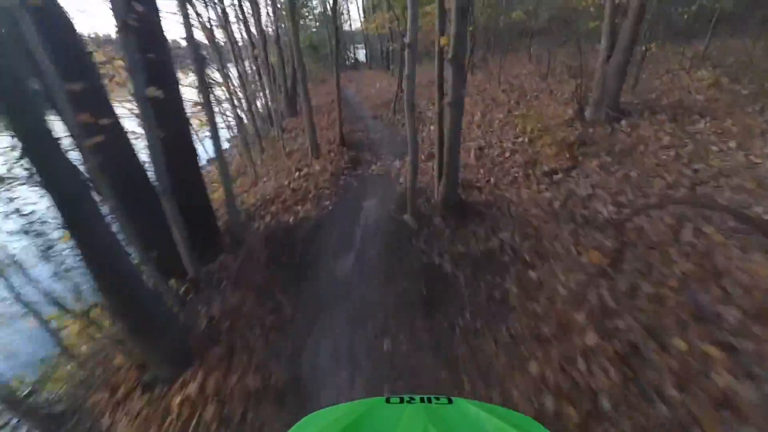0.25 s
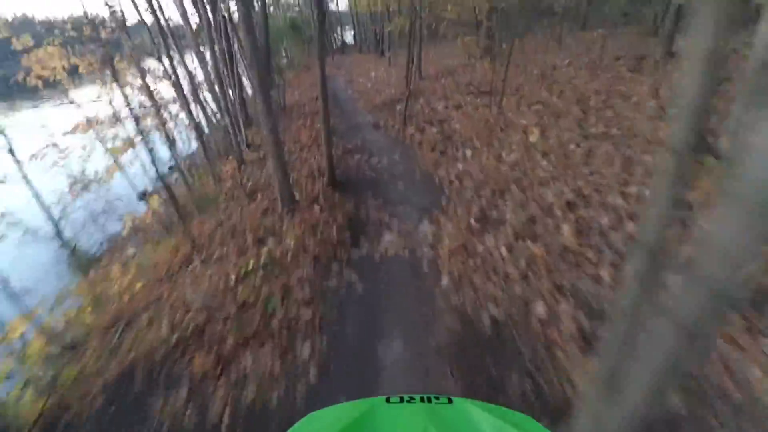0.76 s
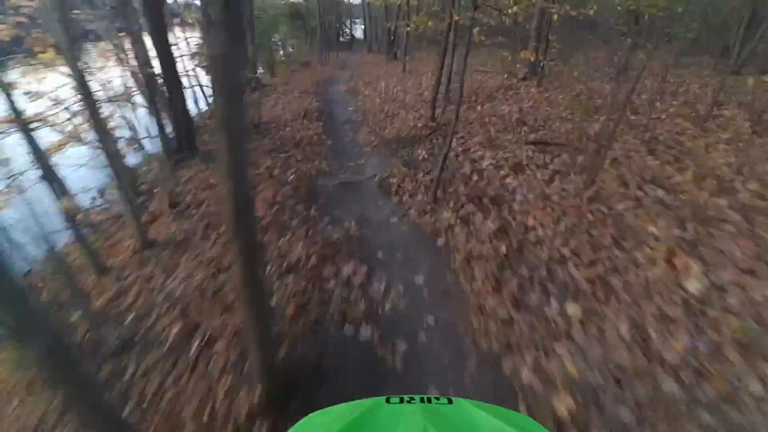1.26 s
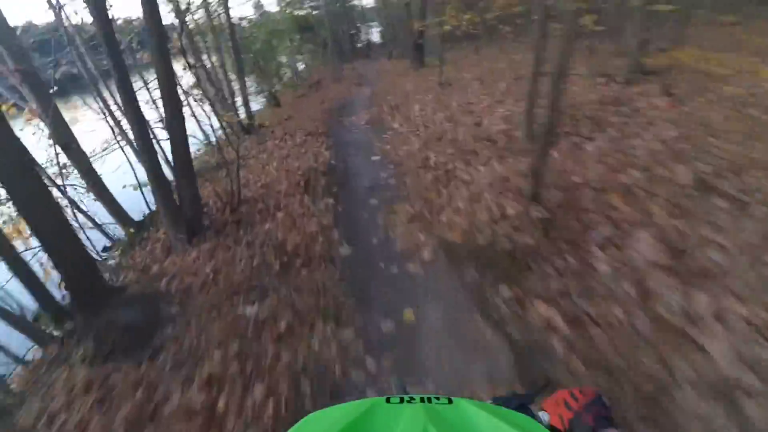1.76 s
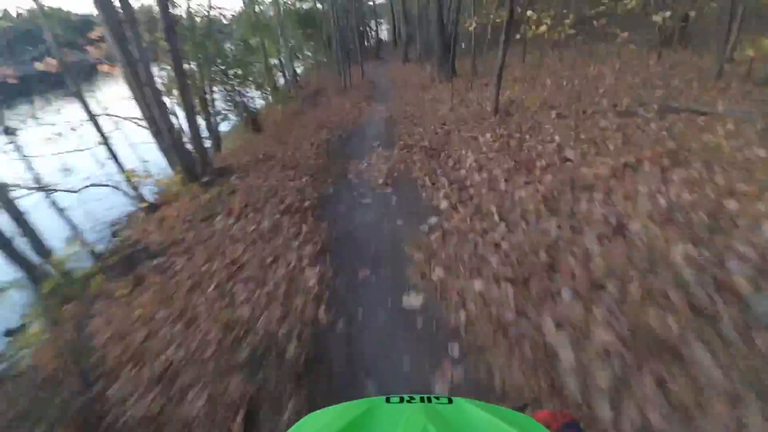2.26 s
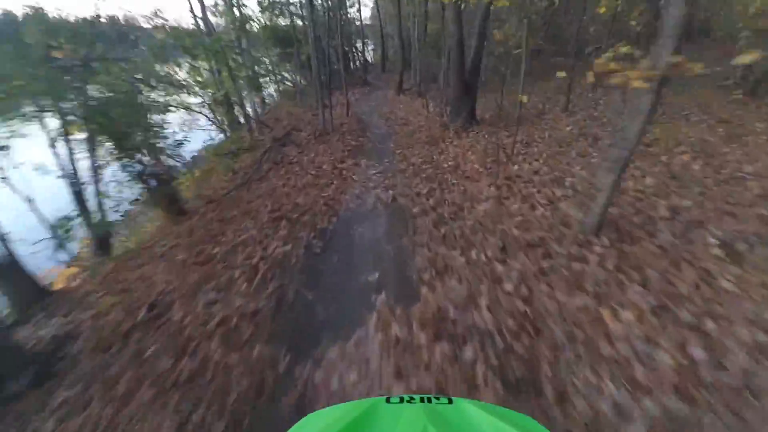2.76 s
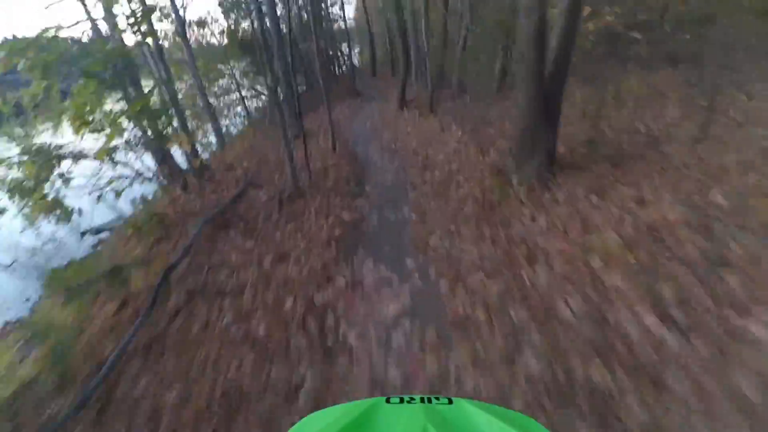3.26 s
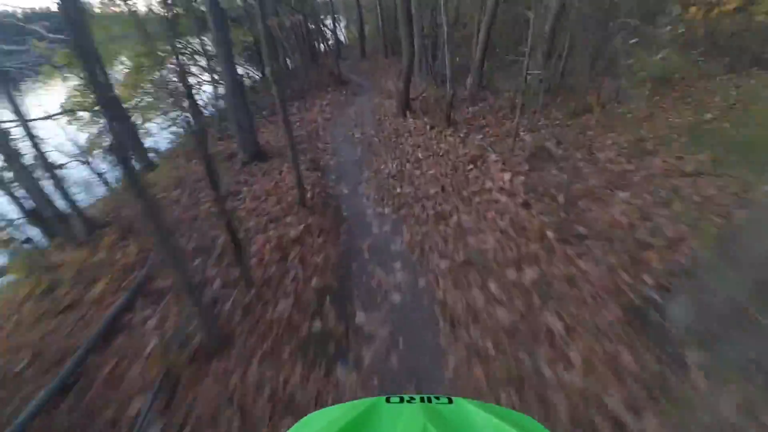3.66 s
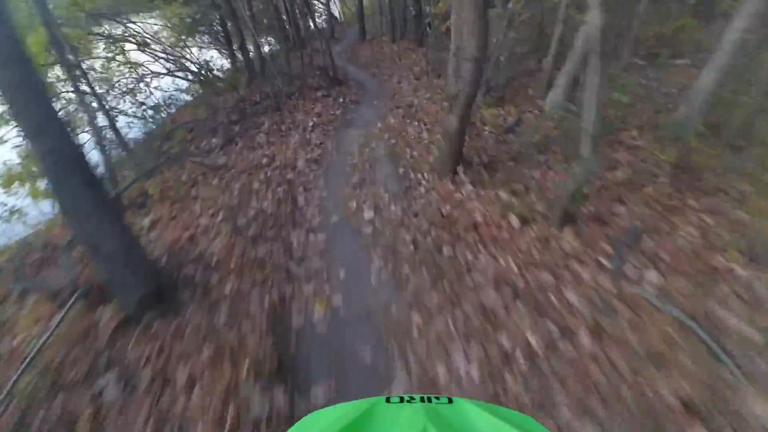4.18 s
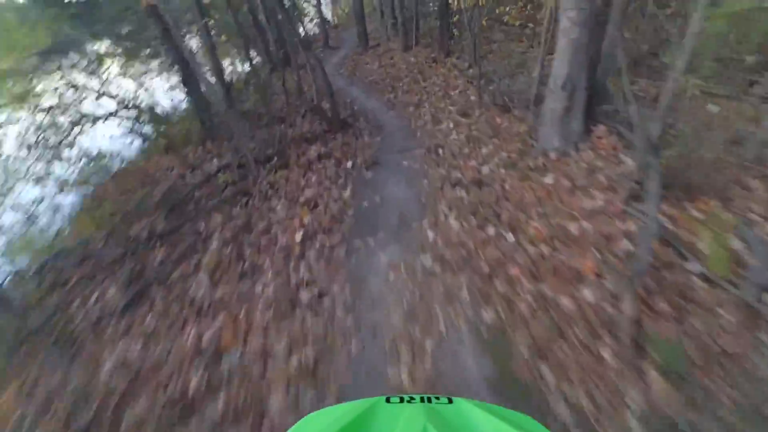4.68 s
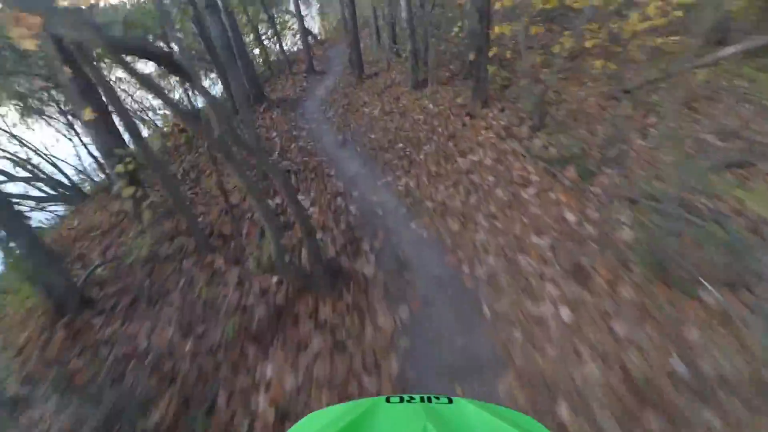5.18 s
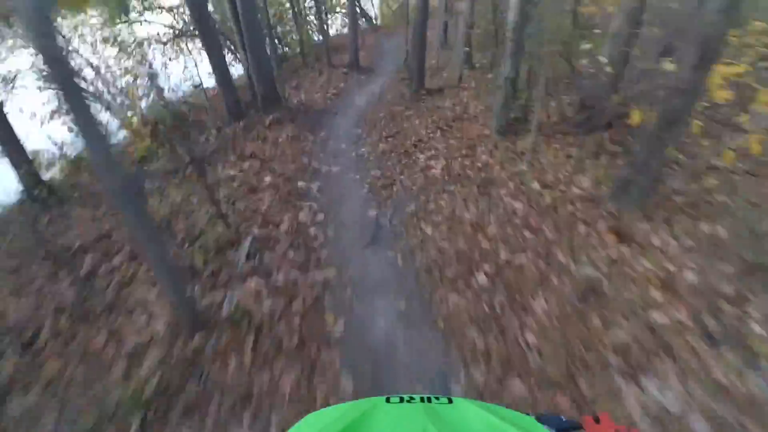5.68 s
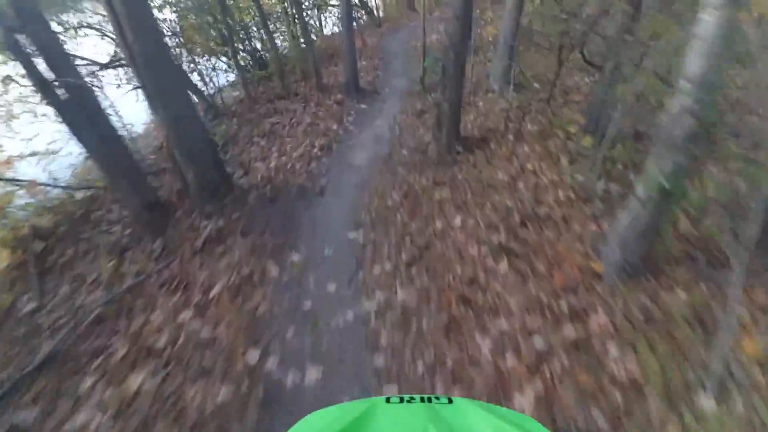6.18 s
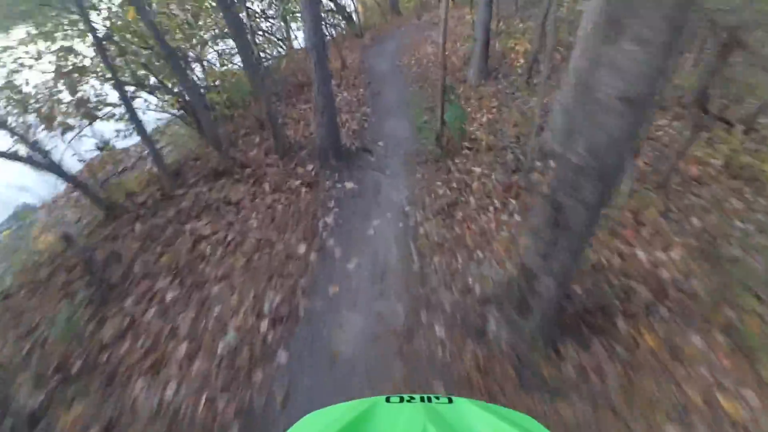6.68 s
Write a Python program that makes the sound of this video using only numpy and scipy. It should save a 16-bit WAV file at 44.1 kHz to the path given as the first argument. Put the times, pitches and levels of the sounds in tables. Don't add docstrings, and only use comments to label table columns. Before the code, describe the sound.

Outdoors on a woodland dirt path, a bicycle tyre hums faintly through a plastic camera case on the helmet. It starts fairly smooth with a low wobble, then a knock and clatter around one and a half seconds. Heavy bumps peak past three seconds, overloading the microphone; a calmer stretch follows, then creaking, thudding and clicking return late. Little dry leaf crackles and soft wind stay in the background.

```python
import sys
import numpy as np
from scipy import signal
from scipy.fft import rfft, irfft
from scipy.io import wavfile
from scipy.ndimage import uniform_filter1d

SR = 44100
rng = np.random.default_rng(int(sys.argv[2]) if len(sys.argv) > 2 else 0)


def attenuation_scalar(level_db):
    decades = np.asarray(level_db, float) / 20
    return 10 ** decades


def dump(signal):
    limited = np.clip(np.atleast_2d(signal).T, -1, 1)
    pcm = np.round(limited * 32767).astype(np.int16)
    wavfile.write(sys.argv[1], SR, pcm)


N = 305613
T = np.arange(N) / SR

# time_s, bob_db, shudder_db
TRAIL = [(0.0, -23.5, -52), (0.55, -27.5, -55.5), (0.75, -12, -50), (0.92, -21.5, -52), (1.6, -26.5, -47),
         (1.9, -17.5, -51.5), (2.2, -9.5, -41.5), (2.57, -27, -56.5), (3.13, -11, -42.5),
         (3.35, -22, -52.5), (4.0, -12.5, -36.5), (4.3, -23, -48.5), (4.69, -26, -52), (5.46, -18.5, -51.5),
         (5.66, -4.5, -39), (5.82, -20, -45.5), (6.2, -22.5, -55.5), (6.93, -21, -51)]
# extreme_s, signed_push, rebound_hz, mount_ring_db
JOLTS = [(0.245, -0.18, 9.7, -47), (0.583, -0.18, 2.7, -48.5), (.757, 0.14, 11.3, -45.5),
         (1.066, -0.19, 9.9, -45), (1.502, -0.24, 8.8, -62), (1.607, -0.38, 10.2, -28),
         (2.006, -0.27, 18.1, -41), (2.082, -0.49, 7.3, -39), (2.213, -0.51, 6.86, -30),
         (2.51, 0.29, 9, -46), (3.131, 0.29, 17.2, -54), (3.182, -0.84, 7.18, -21),
         (3.24, 0.32, 8.2, -32.5), (3.62, -0.28, 10.7, -37), (3.784, 0.11, 11, -39),
         (3.827, -0.51, 8.3, -24.5), (3.95, -0.15, 12.4, -37), (4.048, -0.29, 13.9, -38),
         (4.252, -0.16, 11.3, -53), (4.743, -0.31, 8.9, -42.5), (5.01, -0.15, 13, -51),
         (5.375, -0.32, 12.4, -37), (5.602, -0.44, 10.7, -39), (5.634, -0.81, 8.1, -31.5),
         (5.856, -0.15, 4.3, -29), (5.898, -0.8, 5.46, -22.5), (6.465, -0.047, 41.2, -38),
         (6.516, -0.7, 7.1, -22.5)]
# start_s, signed_push, length_s
THUDS = [
    (1.6, -0.023, 0.0037),
    (2.2, 0.014, 0.0067),
    (3.174, -0.076, 0.0043),
    (3.19, 0.026, 0.00068),
    (3.22, -0.21, 0.0077),
    (3.242, 0.14, 0.0044),
    (3.82, -0.023, 0.0088),
    (5.62, -0.026, 0.015),
    (5.872, 0.14, 0.0051),
    (6.496, 0.037, 0.01),
]
# start_s, stop_s, start_db, stop_db
SCRAPES = [(1.568, 1.592, -55, -44.5), (1.993, 2.032, -46.5, -50), (2.037, 2.067, -43.5, -49),
           (2.154, 2.217, -46, -56.5), (2.216, 2.237, -52, -42), (2.227, 2.277, -40.5, -48.5),
           (2.907, 2.993, -54, -60), (3.144, 3.171, -48, -43), (3.202, 3.24, -40, -43),
           (3.577, 3.623, -53, -51.5), (3.777, 3.825, -48, -53), (3.825, 3.882, -43.5, -44.5),
           (3.906, 3.943, -53, -48), (4.691, 4.734, -61, -49), (5.53, 5.576, -56, -61),
           (5.596, 5.632, -45, -60), (5.632, 5.678, -43.5, -44), (5.668, 5.73, -52, -44.5),
           (5.806, 5.859, -56, -51), (5.845, 5.905, -41, -57), (5.89, 5.935, -43.5, -46),
           (5.927, 5.977, -37.5, -48), (5.973, 6.054, -57.5, -46.5), (6.44, 6.478, -49, -48),
           (6.472, 6.508, -36.5, -48), (6.504, 6.539, -43.5, -44.5), (6.53, 6.569, -40, -43.5)]
# start_s, stop_s, start_db
GRINDS = [
    (1.597, 1.611, -39.5),
    (1.623, 1.65, -42.5),
    (2.109, 2.129, -40.5),
    (2.573, 2.625, -46.5),
    (3.021, 3.051, -42.5),
    (3.104, 3.12, -36.5),
    (5.349, 5.365, -43.5),
    (6.244, 6.271, -51.5),
    (6.565, 6.587, -41),
]
# time_s, peak_db, treble_db
TICKS = [(1.5326, -27, -15.5), (1.6004, -50, -20), (1.728, -55, 4), (2.2331, -23, -13),
         (2.5793, -48.5, -24), (2.7955, -59, -27), (2.8695, -44, -2), (3.016, -48, -14), (3.0278, -39, 3),
         (3.106, -49, -29.5), (3.1767, -39, -32), (3.2075, -37, -26), (3.2235, -33, -24), (3.421, -46, -12),
         (4.25, -53, 5), (4.6748, -43.5, -12), (5.1264, -45, -12), (5.352, -57, -49), (5.6037, -39, -16),
         (5.649, -32.5, -23), (5.851, -40, -23), (5.8614, -40, -19), (5.923, -43, -14), (6.0583, -52, 2),
         (6.187, -59, -14), (6.4462, -41, -22), (6.478, -34, -12), (6.4899, -28, -16)]
# time_s, load_db, litter_db
ROLL = [(0.0, -60.5, -1), (0.39, -61, -4), (0.77, -56.5, -1), (1.87, -55, -0.5), (2.14, -51.5, 1),
        (2.33, -55, 1.5), (2.59, -51, -1.5), (2.93, -53, 1.5), (3.2, -52, 2), (3.71, -52, 1.5),
        (4.1, -55, 1), (4.55, -57.5, -0.5), (5.1, -57.5, 1), (5.4, -62.5, 3.5), (5.95, -60.5, 2),
        (6.18, -63.5, 0), (6.4, -59.5, 3.5), (6.93, -64.5, -1)]
# start_s, stop_s, level_db
LEAVES = [(1.717, 1.7, -62.5), (1.77, 1.79, -68), (2.02, 1.93, -57), (2.905, 2.7, -67), (3.41, 3.457, -68),
          (4.144, 4.196, -70), (4.243, 3.74, -59), (4.895, 4.97, -69), (5.29, 5.36, -64.5),
          (5.516, 5.4, -68), (5.85, 5.884, -58), (5.92, 6, -65), (6.053, 5.91, -58.5), (6.213, 6.3, -63.5),
          (6.33, 5.4, -87), (6.54, 6.54, -64)]

# freq_hz, density_db
BOB = [(2, -32.5), (5, -3.5), (8, 1.5), (11, 1), (15, -8.5), (20, -10.5), (26, -15), (34, -35.5), (45, -30)]
SHUDDER = [(20, -13), (28, -18.5), (40, -2.5), (52, 3), (64, 1.5), (78, -1), (110, -22.5), (200, -23.5),
           (400, -44)]
# freq_hz, level_db
MOUNT_MODES = [(26, 3.5), (40, -5.5), (61, 4), (88, -32.0), (125, -26.5), (175, -37)]
# freq_hz, density_db
RUB = [(240, -51), (400, -14.5), (579, -5.5), (687, -11.5), (850, 1.5), (1250, -3.5), (2030, -8),
       (3900, -10.5), (4830, -22.5), (12000, -44), (15600, -81), (22000, -120)]
# freq_hz, width_hz, level_db
RUB_MODES = [(1241, 174, 8), (1646, 244, 2.5), (2346, 120, -2), (3180, 110, -6), (3824, 190, -7),
             (4540, 51, -63)]
# freq_hz, level_db, t60_s
KNOCK_MODES = [(1220, 2, 0.0053), (1900, 2, 0.0052), (2573, 16.5, 0.0047), (3010, 6, 0.0042),
               (3705, 9, 0.0056), (4110, -8.5, 0.008), (4500, -7, 0.005), (5360, 4.5, 0.005)]
BRIGHT_MODES = [(5750, 0, .003), (6400, -3, .0025), (7300, -6, .002), (8500, -3, .002), (10500, -6, .002),
                (13000, -6, .002)]
# freq_hz, density_db
ROAR = [(350, -53), (600, -11), (1260, 1), (1350, 1.5), (1480, -10), (1650, -4.5), (1870, -21), (2570, -12),
        (4670, -34), (6000, -33.5), (7800, -77.5), (13200, -120)]
# freq_hz, width_hz, level_db
ROAR_MODES = [(901, 52, -1.5), (1175, 240, -2.5), (1374.4, 46, 4), (1600, 80, -12.5), (2438, 210, -17),
              (3238, 200, -16.5), (3810, 610, -23)]
# freq_hz, density_db
HISS = [(2350, -25.5), (4000, -16), (4660, -7), (5590, -9), (7990, -12.5), (12400, -15.5), (14500, -16),
        (15500, -38)]
# freq_hz, width_hz, level_db
HISS_MODES = [(5550, 120, -4), (7493, 14, 1), (11310, 200, -8.5), (14400, 700, -10)]
# freq_hz, density_db
CRACKLE = [(2500, -21), (4500, -10), (5800, -7.5), (7500, -12), (11000, -16.5), (15500, -24)]
# freq_hz, density_db
WIND = [(65, -53), (110, -2), (205, -4), (422, -8.5), (507, -6.5), (712, -10), (800, -11), (1040, -27),
        (1760, -120)]

HISS_DB, WIND_DB = -73, -62.5
GRAVEL_DB, GRAVEL_PER_LOAD, GRAVEL_PER_LITTER, QUIET_LOAD_DB = -64, .65, 0.98, -59.5
PRESS_DB, PRESS_S, PRESS_OFFSET_S = 2, 0.043, -0.035
REBOUND_T60_S, T60_PER_PLUNGE_S = 0.545, 0.46
SCRAPE_EDGE_DB, GRIND_EDGE_DB, GRIND_FADE_DB = 4, -4, -6.5
CEILING = .893


def evened(x):
    return x / np.sqrt(np.mean(x ** 2) + 1e-20)


def curve(rows, column):
    return np.interp(T, [r[0] for r in rows], [r[column] for r in rows])


def colour(x, spectrum, modes=(), base_db=0.):
    hz = np.fft.rfftfreq(N, 1 / SR)
    f, db = np.transpose(spectrum)
    smooth_db = np.interp(np.log(hz + 0.03), np.log(f), db, -120, -120)
    power = attenuation_scalar(2 * (base_db + smooth_db))
    for mode_hz, width_hz, mode_db in modes:
        power = power + attenuation_scalar(2 * mode_db) / (1 + (2 * (hz - mode_hz) / width_hz) ** 2) ** 2
    return evened(irfft(rfft(x) * np.sqrt(power), N))


def flicker(hz):
    span = int(SR / hz)
    x = uniform_filter1d(uniform_filter1d(rng.standard_normal(N), span), span)
    return evened(x - uniform_filter1d(x, 5 * span))


def grit(per_s, spread_db):
    size = attenuation_scalar(spread_db * np.minimum(rng.exponential(1, N), 5)) * rng.standard_normal(N)
    return evened(size * (rng.random(N) < per_s / SR))


def ring(modes):
    t = T[:1500]
    x = sum(attenuation_scalar(db - 60 * t / t60) * np.sin(2 * np.pi * hz * t) for hz, db, t60 in modes)
    x = x * np.minimum(t / 0.00094, 1)
    return x / abs(x).max()


def jolts():
    calm, blows = np.ones(N), np.zeros(N)
    for s, push, hz, ring_db in JOLTS:
        t60 = max(REBOUND_T60_S - T60_PER_PLUNGE_S * push, .1)
        part = slice(max(round((s - .3) * SR), 0), round((s + 1.7) * SR))
        t = T[part] - s
        plunge = np.cos(2 * np.pi * 13.3 * t) * np.exp(-(t / 0.04) ** 2)
        rebound = np.cos(2 * np.pi * hz * t) * attenuation_scalar(-60 * t / t60) * np.exp(-(t / 0.49) ** 2)
        ring_fade = attenuation_scalar(-60 * (np.hypot(t, .012) - .012) / 0.21)
        swing = np.where(t < 0, np.exp(-(t / 0.0092) ** 2), ring_fade)
        mount = sum(attenuation_scalar(db) * np.cos(2 * np.pi * f * (t - .003)) for f, db in MOUNT_MODES)
        blows[part] += push * np.where(t < 0, plunge, rebound)
        blows[part] += np.sign(push) * attenuation_scalar(ring_db) * swing * mount
        calm[part] *= 1 - min(1.6 * abs(push), 1) * np.exp(-((t - .03) / 0.035) ** 4)
    blows = blows - uniform_filter1d(blows, SR // 3)
    return blows, calm * signal.windows.tukey(N, .012)


def helmet():
    blows, calm = jolts()
    bob = colour(rng.standard_normal(N), BOB)
    bob = bob / (0.65 + abs(signal.hilbert(bob)))
    shudder = colour(rng.standard_normal(N), SHUDDER)
    shudder = shudder * attenuation_scalar(0.68 * flicker(22) + 2.7 * flicker(6.2))
    sway = attenuation_scalar(uniform_filter1d(curve(TRAIL, 1), SR // 10))
    return blows + calm * (sway * evened(bob) + attenuation_scalar(curve(TRAIL, 2)) * evened(shudder))


def thuds():
    out = np.zeros(N)
    for s, push, length in THUDS:
        u = np.clip((T - s) / length, 0, 30)
        out += push * u * np.exp(1 - u) * (1 - u / 2)
    return out


def scrapes():
    slips = (grit(5000, 0.99) + 0.73 * rng.standard_normal(N)) * attenuation_scalar(0.66 * flicker(340))
    slips = slips * attenuation_scalar(1.0 * flicker(90))
    rub = colour(slips, RUB, RUB_MODES, base_db=-1)
    bright = signal.lfilter(*signal.butter(2, 2000, "high", fs=SR), rub)
    level, edge = np.zeros((2, N))
    slides = [(*row, SCRAPE_EDGE_DB) for row in SCRAPES]
    slides += [(start, stop, db, db + GRIND_FADE_DB, GRIND_EDGE_DB) for start, stop, db in GRINDS]
    for start, stop, start_db, stop_db, bright_db in slides:
        part = slice(round(start * SR), round(stop * SR))
        t = T[part] - start
        shape = np.clip(t / 0.0095, 0, 1) * np.minimum((stop - start - t) / 0.0068, 1)
        gain = attenuation_scalar(start_db + (stop_db - start_db) * t / (stop - start)) * shape
        level[part] += gain
        edge[part] += gain * (attenuation_scalar(bright_db) - 1)
    return level * rub + edge * bright


def ticks():
    low, high = np.zeros((2, N))
    for s, db, treble_db in TICKS:
        low[round(s * SR)] = attenuation_scalar(db)
        high[round(s * SR)] = attenuation_scalar(db + treble_db)
    body = signal.oaconvolve(low, ring(KNOCK_MODES))[:N]
    sparkle = signal.oaconvolve(high, ring(BRIGHT_MODES))[:N]
    fizz = rng.standard_normal(1500) * attenuation_scalar(-21 - 60 * T[:1500] / 0.014)
    fizz[[0, 75, 190]] = 1, -.25, .12
    return signal.oaconvolve(body + sparkle, fizz)[:N]


def tyre(load_db, litter_db, lumps, gusts):
    drive = rng.standard_normal(N) + .5 * grit(900, 0.71)
    roar = colour(drive * attenuation_scalar(0.78 * lumps + 0.36 * gusts), ROAR, ROAR_MODES, base_db=-2.5)
    drone = signal.sosfiltfilt(signal.butter(4, 1900, fs=SR, output="sos"), roar)
    rush = (roar - drone) * attenuation_scalar(0.68 * flicker(14))
    gravel_db = GRAVEL_DB + GRAVEL_PER_LOAD * (load_db - QUIET_LOAD_DB) + GRAVEL_PER_LITTER * litter_db
    return attenuation_scalar(load_db) * evened(drone) + attenuation_scalar(gravel_db) * evened(rush)


def litter_hiss(litter_db, lumps, gusts):
    drive = rng.standard_normal(N) + 0.75 * grit(1500, 3.8)
    drive = drive * attenuation_scalar(1.0 * lumps + 0.13 * gusts + 1.6 * flicker(14))
    return attenuation_scalar(HISS_DB + litter_db) * colour(drive, HISS, HISS_MODES, base_db=0.5)


def rolling():
    lumps, gusts = flicker(69), flicker(21.7)
    press = sum(abs(push) * np.exp(-((T - s - PRESS_OFFSET_S) / PRESS_S) ** 2) for s, push, *_ in JOLTS)
    load_db, litter_db = curve(ROLL, 1) + PRESS_DB * press, curve(ROLL, 2)
    return tyre(load_db, litter_db, lumps, gusts) + litter_hiss(litter_db, lumps, gusts)


def leaves():
    crackle = colour(grit(2500, 0.84), CRACKLE)
    level = sum(attenuation_scalar(db) * ((T > start) & (T < stop)) for start, stop, db in LEAVES)
    return uniform_filter1d(uniform_filter1d(level, size=400), size=300) * crackle


def wind():
    return attenuation_scalar(WIND_DB) * colour(rng.standard_normal(N) * attenuation_scalar(0.5 * flicker(50)), WIND)


def scene():
    mount = helmet() + thuds() + scrapes() + ticks()
    trail = rolling() + leaves() + wind()
    return (mount + trail)[None]


def roll_off(x):
    return signal.sosfilt(signal.butter(12, 15960, fs=SR, output="sos"), x)


def record(dry):
    clipped = np.clip(dry, -CEILING, CEILING)
    return roll_off(clipped)


dry = scene()
out = record(dry)
dump(out)
```